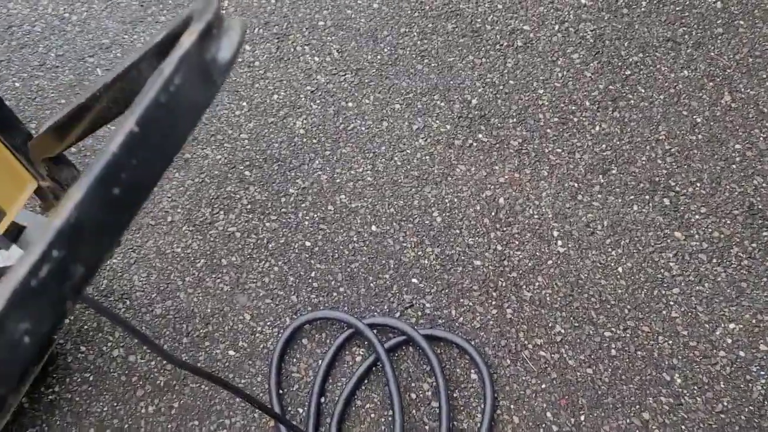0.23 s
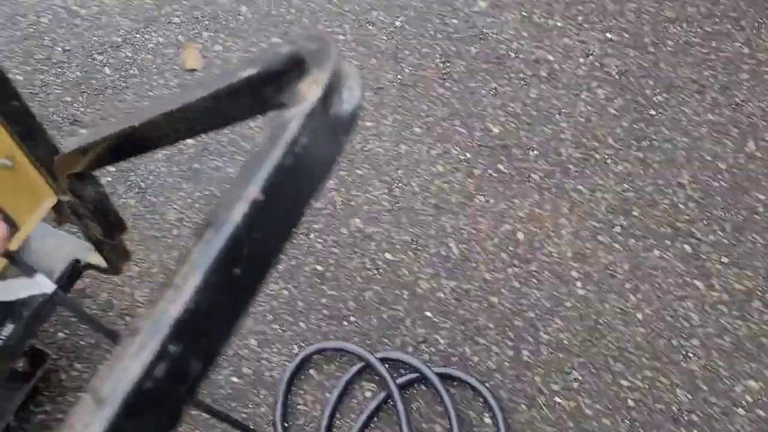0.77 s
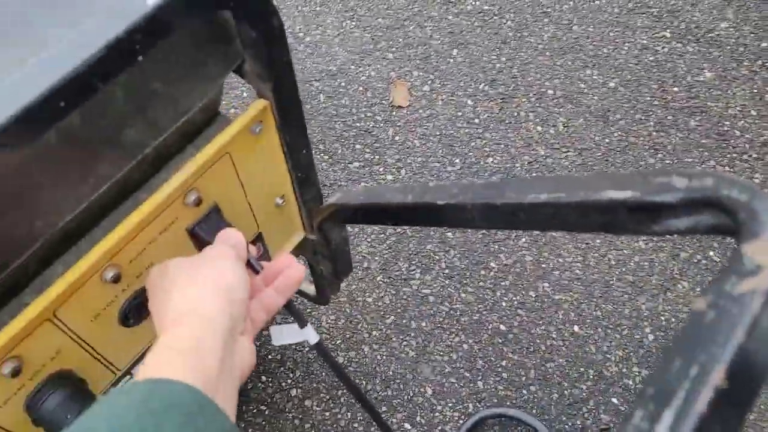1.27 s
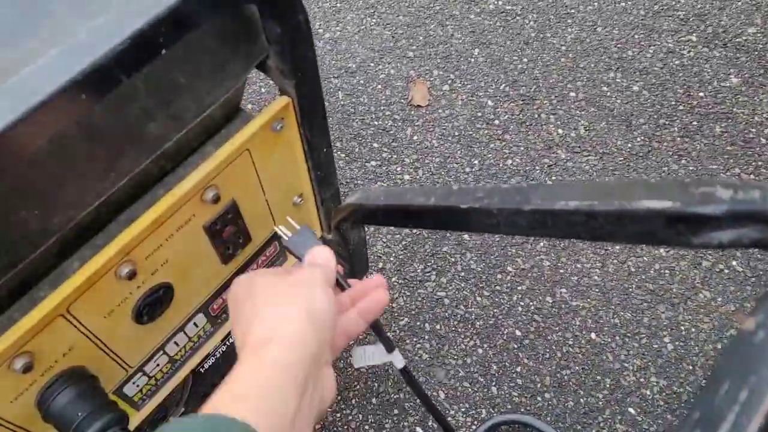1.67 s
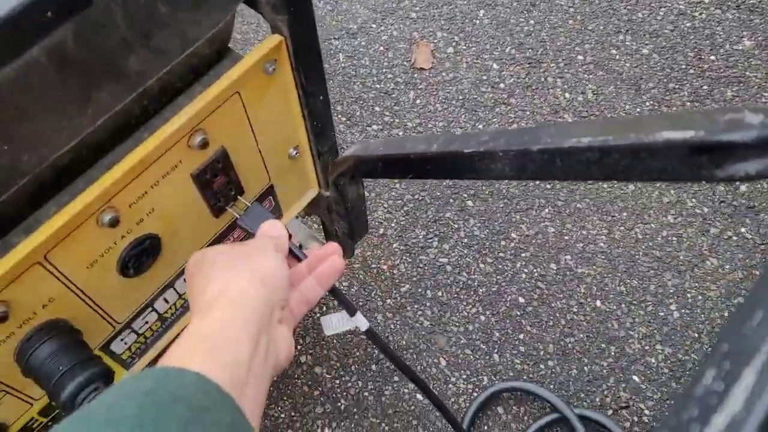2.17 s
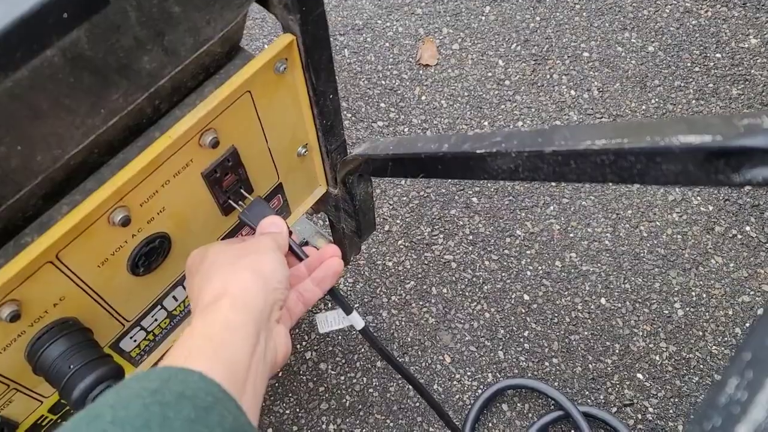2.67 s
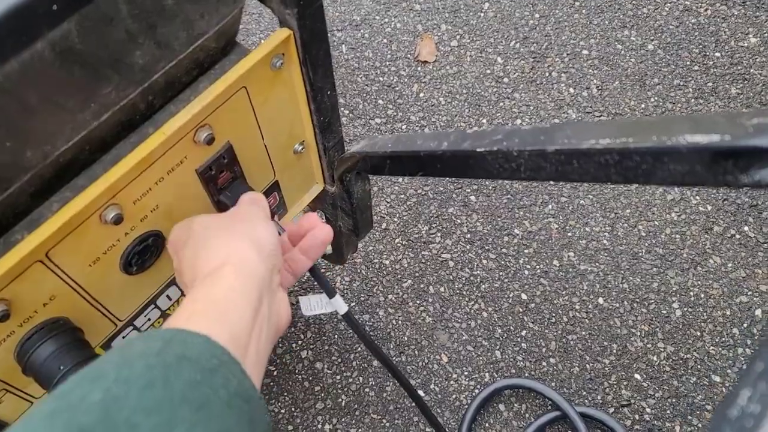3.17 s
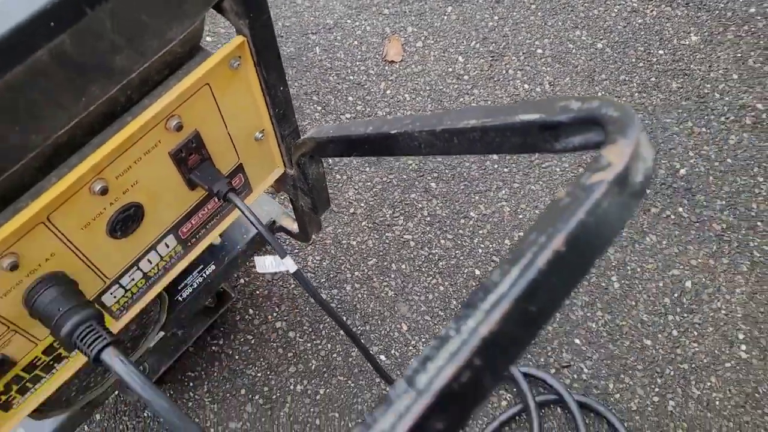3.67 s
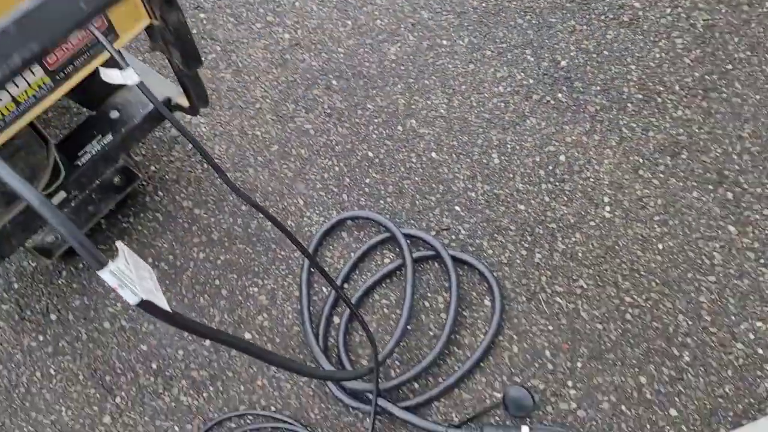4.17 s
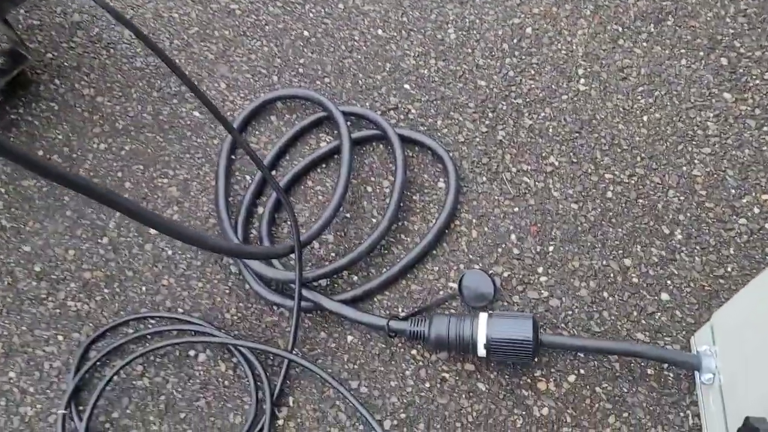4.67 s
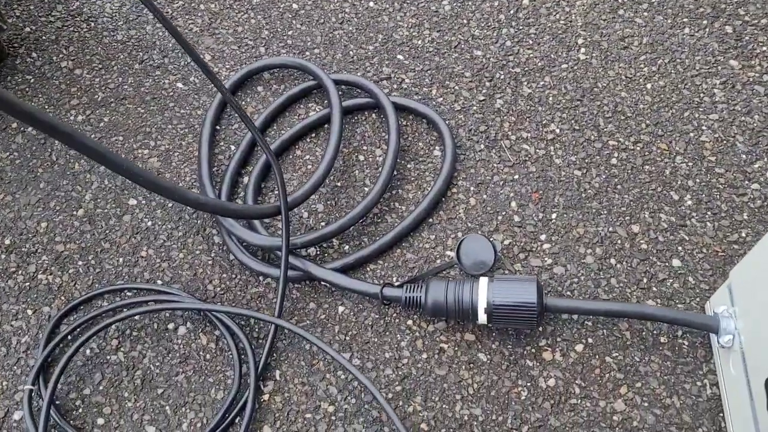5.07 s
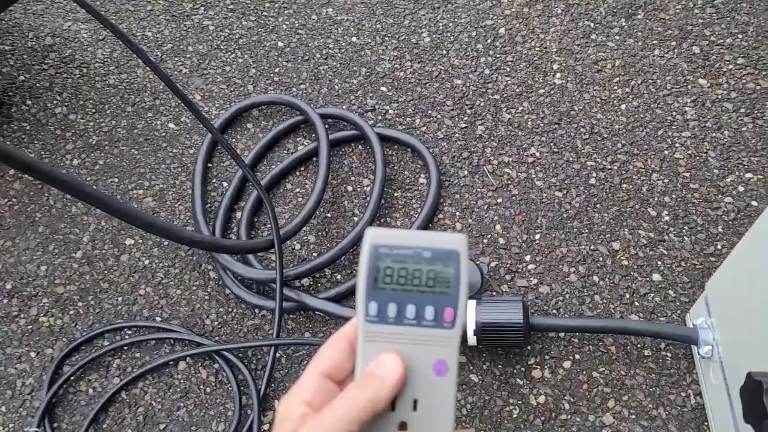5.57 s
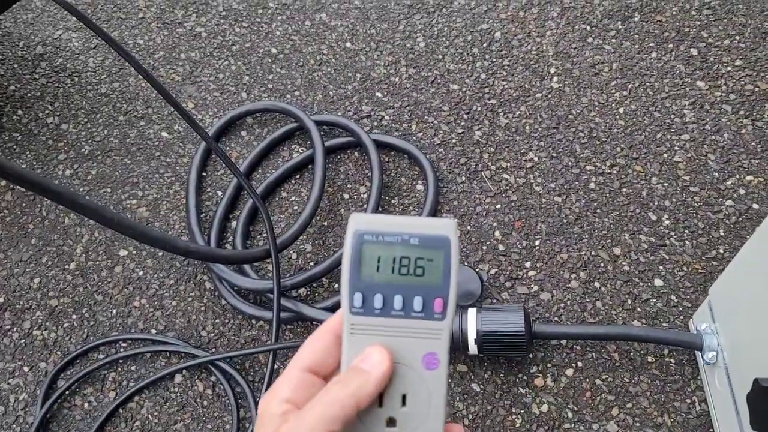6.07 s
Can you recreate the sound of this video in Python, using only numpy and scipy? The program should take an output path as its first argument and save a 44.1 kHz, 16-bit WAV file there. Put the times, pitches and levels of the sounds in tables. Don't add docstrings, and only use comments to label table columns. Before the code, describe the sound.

A portable single-cylinder four-stroke generator is already running and continues without a break for about 6.3 seconds outdoors on asphalt. Its exhaust fires roughly thirty times a second, a dense rough drone rather than separate puffs, with casing knocks and fine metallic valve ticks in every cycle. A weak fan whine sits within low rumble, midrange air rush and bright hiss, all pulsing with the engine. From 0 to 1 second the hand-held phone moves closer; from about 1.2 to 3.8 seconds it stays beside the panel, full and clattery. Between 4.2 and 5 seconds it swings away, the low throb and upper knocks easing while airy midrange becomes more apparent. Slight lags near 0.4, 1.6, 2.9, 4 and 5 seconds barely bend the pitch, with the deepest sag at the end. Close, wide stereo, no obvious reverberation, slightly patchy treble.

```python
import sys
import numpy as np
from scipy import signal
from scipy.fft import rfft, irfft, next_fast_len
from scipy.io import wavfile

SR = 44100
rng = np.random.default_rng(int(sys.argv[2]) if len(sys.argv) > 2 else 0)


def ratio_of_db(decibels):
    return 10 ** (np.asarray(decibels, float) / 20)


def dump_mix(stems):
    frames = np.atleast_2d(stems).T
    limited = np.clip(frames, -1, 1)
    pcm = np.round(limited * 32767).astype(np.int16)
    wavfile.write(sys.argv[1], SR, pcm)


N = 278271

# multiple of the cycle,
# panel left level/dB, panel right level/dB, away left level/dB, away right level/dB
EXHAUST_ORDERS = [(1, -35, -36, -41, -39), (2, -16, -15, -21.5, -22), (3, -26, -26, -31, -28),
                  (4, -29, -25.5, -36, -33.5), (5, -17, -15.5, -16.5, -16.0), (6, -29, -37, -28.5, -26),
                  (7, -37, -31, -35.5, -28), (8, -35, -27, -27, -26.5), (9, -32, -31, -36, -33.5),
                  (10, -36.5, -29, -29, -35.5), (11, -37, -35, -30, -27), (12, -33, -51, -38.5, -39)]
KNOCK_ORDERS = [(13, -31, -32.5, -49.5, -53), (14, -35.5, -46, -34.5, -53), (15, -40, -31, -36, -59),
                (16, -26.5, -36.5, -46.5, -29.5), (17, -41.5, -39, -40, -40.5), (18, -37, -29, -46, -49),
                (19, -43, -37, -45, -38), (20, -34, -29.5, -37, -43), (21, -39, -32.5, -52, -46),
                (22, -41, -46, -42, -48), (23, -49, -38.5, -42, -40.5), (24, -41.5, -32, -35.5, -31.5),
                (26, -53, -35, -34.5, -34), (29, -57, -39.5, -53, -50), (30, -41.5, -46, -40, -49),
                (31, -52, -44, -47, -43)]
# t/s of the deepest lag, lag/cycles, sag time/s
WEAK_FIRINGS = [
    (.365, .066, .365),
    (1.6, .049, .137),
    (2.135, .011, .111),
    (2.936, .04, .116),
    (3.955, .035, .234),
    (4.435, .034, .1),
    (4.952, .075, .114),
    (5.243, .044, .158),
    (5.82, .075, .14),
    (6.33, .115, .27),
]
# turn/cycles, f/Hz, t60/s, left level/dB, right level/dB, spread/dB
VALVE_TICKS = [
    (.78, 1590, 0.025, -24.5, -25, -3.5),
    (.79, 1810, 0.0051, -33, -20, 1.5),
    (0.57, 2400, .008, -34, -30, 2),
    (0.1, 3730, 0.0028, -29, -22, -2),
    (0.3, 6400, .006, -27, -27.5, 5),
    (0.6, 6000, .003, -24, -22.5, 3),
    (0.7, 5400, 0.0027, -26, -29, 3.5),
    (.44, 12800, .002, -28, -25, 2),
]
# f/Hz, panel level/dB per Hz, away level/dB per Hz
RUMBLE_SPECTRUM = [(25.1, -4, -6), (60, 0.5, 1), (149, -6, 4), (298, 0, 3), (496, 1, 4.5), (730, 0, 11),
                   (952, 2, 6.5), (1280, -30, -1)]
RUSH_SPECTRUM = [(930, -13.5, -11), (1130, -2.5, -6), (1290, 4, -2), (1280, 0, 2), (1530, -3.5, -1.5),
                 (1576, 0, -2.5), (1910, -10.5, -5.5), (2330, -14, -9.5), (2520, -18, -34)]
HISS_SPECTRUM = [(2090, -9, -28), (2290, 0, 0), (2420, 5.5, 4.5), (2680, -2, -1.5), (2710, 2, -2.5),
                 (3900, -2, 0.5), (4470, -3, 0), (5430, 3, 0.5), (6950, 1, -1), (7860, -3.5, -6),
                 (8990, 12, 12), (9820, -6, -7), (11900, -5.5, -3.5), (15300, -4, -4.5), (17000, -10, -10)]
# t/s, distance from the silencer/0-1, turned from the panel/0-1, cooling-air exposure/dB
PHONE_PATH = [(0, 0.8, 0.33, 0.5), (.4, 0.35, 0.37, 0), (.85, 0.27, 0.34, 0), (1.25, .05, .08, -0.5),
              (1.7, .03, 0, 0.5), (1.87, .02, 0.1, -1), (2.1, .02, 0.03, 0), (2.5, 0.1, .03, -0.7),
              (2.9, 0.05, 0.07, 0), (3.15, 0, 0, -1), (3.8, 0.2, 0.27, 0), (4.2, 0.26, 0.2, 0.5),
              (4.45, 0.64, 0.39, 1.5), (4.7, 0.96, 0.7, .5), (4.95, 0.97, 0.86, 1.6), (5.2, 1, 0.86, 0),
              (5.65, 0.94, 0.89, 0), (6.31, 1, 0.91, .5)]
# f/Hz, shared part/0-1, left lead at the panel/rad, left lead away/rad
MIC_PORTS = [(30, 0.7, 0.27, 0.68), (147, 0.87, 0.28, 0.18), (280, 1, 0.5, 0.78), (600, 0.67, 1.28, 2.37),
             (1020, 0.71, 1.65, 2.3), (1640, 0.96, 2.03, 3.27), (2010, 0.44, 2.42, 4.54),
             (3020, 0.33, 2.9, 5.1), (3840, 0.01, 2.8, 2.4)]
# f/Hz, panel left-right level/dB, away left-right level/dB
BODY_SHADE = [(101, 7, 1), (504, 3, 2.5), (770, -4, 3), (1210, 1.5, 4.5), (1790, -1, -5), (2830, 3.5, 3.5),
              (3960, -3, -4.5), (6500, 0.5, 1.5), (10000, -1, 1), (15000, -2.5, -1.5)]
# f/Hz, skirt width/Hz, floor width/Hz
PORT_NOTCHES = [(8450, 1300, 300), (8800, 900, 250), (9150, 1300, 350)]
# f/Hz, share of time left empty/0-1
TREBLE_GAPS = [(7700, 0), (8200, .35), (8550, .85), (9000, .88), (9350, .6), (9800, .22), (10800, .04),
               (15000, .02), (15700, .1)]
# panel level/dB, away level/dB, share of the exposure that it follows
EXHAUST_DB, KNOCK_DB, WHINE_DB = (-1.02, -0.24, 0.46), (0.3, 1.6, 0.4), (-29, -30.5, 2)
RUMBLE_DB, RUSH_DB, HISS_DB = (-30, -32, 0.7), (-27.5, -27, 1.2), (-27.5, -27, 1.7)
# panel level/dB, away level/dB
RUSH_PAN_DB, HISS_PAN_DB = (-2.5, -3.5), (-4, 0.5)
LOW_LAG_RAD, KNOCK_LAG_RAD = (.25, .5, 0), (.5, 1.6, 0)

CYCLE_HZ = 30.5396


def crank():
    start_turn, recovery, jitter = -.052, 1.18, .002
    s = np.arange(N) / SR
    lag = 0
    for deepest, depth, sag_s in WEAK_FIRINGS:
        width_s = np.where(s < deepest, sag_s, recovery * sag_s)
        lag = lag + depth * np.exp(-((s - deepest) / width_s) ** 2)
    return start_turn + CYCLE_HZ * s - lag + jitter * drift(5.0)


def exhaust(turns, away):
    pulse_turn, second_dip_turn, second_dip = .495, .41, .8
    panel_echo_rad = 2.1

    def line_up(order):
        second = second_dip * np.exp(-2j * np.pi * order * second_dip_turn)
        phase = np.pi * (order > 1) + np.angle(1 + second)
        phase = phase - (order < 4) * (order - 1) * level(LOW_LAG_RAD, away)
        return phase + (order > 8) * panel_echo_rad * (1 - away) + (order in (6, 8)) * .5

    return orders(EXHAUST_ORDERS, turns - pulse_turn, away, line_up, wander_db=1.3, wander_rad=.2)


def knock(turns, away):
    knock_turn, echo_turn, echo = .385, .38, .9

    def line_up(order):
        second = echo * away * np.exp(-2j * np.pi * order * echo_turn)
        return np.angle(1 + second) - level(KNOCK_LAG_RAD, away)

    burst = orders(KNOCK_ORDERS, turns - knock_turn, away, line_up, wander_db=1.0, wander_rad=.1)
    return ratio_of_db(0.99 * drift(8.5)) * burst


def orders(table, turns, away, line_up, wander_db, wander_rad):
    out = np.zeros((2, N))
    for order, *db in table:
        order = round(order)
        level_db = np.outer(db[:2], 1 - away) + np.outer(db[2:], away)
        loose = 0.25 if order in (2, 5) else 1
        phase = line_up(order) + loose * wander_rad * drift(2.8)
        out += ratio_of_db(level_db + loose * wander_db * drift(2.2)) * tone(turns, order, phase, away)
    return out


def tone(turns, order, phase, away):
    hz = order * CYCLE_HZ
    lead = (1 - away) * at_hz(MIC_PORTS, hz, axis=2) + away * at_hz(MIC_PORTS, hz, axis=3)
    return np.sqrt(2) * np.cos(2 * np.pi * order * turns + phase + lead * [[1], [0]])


def valve_gear(turns, jitter_s):
    out = np.zeros((2, N))
    for turn, hz, t60, left_db, right_db, spread_db in VALVE_TICKS:
        at = np.flatnonzero(np.diff(np.floor(turns - turn)))
        timing, strength = rng.standard_normal((2, len(at)))
        at = np.clip(at + (timing * jitter_s * SR).astype(int), 0, N - 1)
        clicks = np.full(N, 1e-18)
        clicks[at] = ratio_of_db(spread_db * strength)
        r, w = ratio_of_db(-60 / (t60 * SR)), 2 * np.pi * hz / SR
        mode = [1, -2 * r * np.cos(w), r * r]
        rung = signal.lfilter([0, np.sin(w)], mode, clicks)
        rung = signal.lfilter([1 - r, 0, r - 1], mode, rung) * np.e
        late = round(at_hz(MIC_PORTS, hz, axis=2) / w)
        right = np.concatenate([np.zeros(late), rung[:N - late]])
        out += ratio_of_db([[left_db], [right_db]]) * [rung, right]
    return out


def fan_whine(turns, whine_db, away):
    fan_order = 40
    level_db = whine_db + 0.25 * drift(9.0) + throb(turns, 0.052, 0.83, 2.0) + [[-1.5], [0]]
    return ratio_of_db(level_db) * tone(turns, fan_order, 0.75 * drift(3.2), away)


def air(turns, away, exposure_db):
    rumble_db = level(RUMBLE_DB, away, exposure_db) + 5.5 + 0.98 * drift(36.0)
    rush_db = level(RUSH_DB, away, exposure_db) + 5.5 + 0.36 * drift(8.3)
    hiss_db = level(HISS_DB, away, exposure_db) + 6.0 + 0.73 * drift(7.2)
    rumble = ratio_of_db(rumble_db + throb(turns, 0.31, 0.85, 0.21)) * port_noise(RUMBLE_SPECTRUM, away)
    rush = ratio_of_db(rush_db + throb(turns, 0.32, 0.53, 0.27)) * port_noise(RUSH_SPECTRUM, away)
    hiss = ratio_of_db(hiss_db + throb(turns, 0.56, 0.99, 0.52)) * port_noise(HISS_SPECTRUM, away)
    return rumble + panned(level(RUSH_PAN_DB, away)) * rush + panned(level(HISS_PAN_DB, away)) * hiss


def throb(turns, peak_turn, once_db, twice_db):
    angle = 2 * np.pi * (turns - peak_turn)
    return once_db * np.cos(angle) + twice_db * np.cos(2 * angle)


def port_noise(spectrum, away):
    size = next_fast_len(N)
    hz = np.maximum(np.arange(size // 2 + 1) * SR / size, 1)
    band = (hz > spectrum[0][0]) * (hz < spectrum[-1][0])
    shared, left, right = rfft(rng.standard_normal((3, size))) * band
    share = np.clip(at_hz(MIC_PORTS, hz, axis=1), 0, 1)
    heard = []
    for place in (1, 2):
        lead = np.exp(1j * at_hz(MIC_PORTS, hz, axis=place + 1))
        common = np.sqrt(share) * shared * [lead, np.ones_like(lead)]
        pair = common + np.sqrt(1 - share) * np.array([left, right])
        colour = ratio_of_db(at_hz(spectrum, hz, axis=place)) * panned(at_hz(BODY_SHADE, hz, axis=place))
        heard.append(rms_one(irfft(pair * colour, size)[:, :N]))
    return (1 - away) * heard[0] + away * heard[1]


def panned(db):
    return ratio_of_db(np.array([db / 2, -db / 2]))


def level(db, away, exposure_db=0):
    return db[0] + (db[1] - db[0]) * away + db[-1] * exposure_db


def drift(rate):
    r = np.exp(-80 * np.pi * rate / SR)
    noise = rng.standard_normal(N // 40 + 2002)
    slow = signal.lfilter([1], [1, -2 * r, r * r], noise)[2000:]
    return np.interp(np.arange(N) / 40, np.arange(len(slow)), rms_one(slow))


def rms_one(x):
    return x / np.sqrt(np.mean(x ** 2) + 1e-20)


def in_time(rows):
    s, *columns = np.transpose(rows)
    return [np.interp(np.arange(N) / SR, s, c) for c in columns]


def at_hz(points, hz, axis):
    return np.interp(np.log(hz), np.log(np.array(points)[:, 0]), np.array(points)[:, axis])


def scene():
    turns = crank()
    far, away, exposure_db = in_time(PHONE_PATH)
    far, away = np.clip([far, away], 0, 1)
    pulses = ratio_of_db(level(EXHAUST_DB, far, exposure_db)) * exhaust(turns, far)
    knocks = ratio_of_db(level(KNOCK_DB, away, exposure_db)) * knock(turns, away ** 1.45)
    ticks = valve_gear(turns, jitter_s=0.00017)
    whine_db = level(WHINE_DB, far ** 4.8, exposure_db) + 2.7 * drift(1.1)
    whine = fan_whine(turns, whine_db, away)
    return pulses + knocks + ticks + whine + air(turns, away, exposure_db)


def port_cavity(x):
    for hz, skirt_hz, floor_hz in PORT_NOTCHES:
        c = 2 * np.cos(2 * np.pi * hz / SR)
        zero, pole = np.exp(-np.pi * np.array([floor_hz, skirt_hz]) / SR)
        bass_gain = (1 - zero * c + zero ** 2) / (1 - pole * c + pole ** 2)
        x = signal.lfilter([1, -zero * c, zero ** 2], [1, -pole * c, pole ** 2], x) / bass_gain
    return x


def treble_dropouts(x):
    top_hz = 15760
    hz, s, frames = signal.stft(x, SR, nperseg=2048)
    own = rng.standard_normal((2, len(hz) // 4 + 1, len(s)))
    own = np.repeat(own, 4, axis=1)[:, :len(hz)]
    together = drift(7.0)[np.minimum((s * SR).astype(int), N - 1)]
    rank = 1 / (1 + np.exp(-1.7 * (0.55 * together + 0.83 * own)))
    kept = rank > np.interp(hz, *np.transpose(TREBLE_GAPS))[:, None]
    return signal.istft(frames * kept * (hz < top_hz)[:, None], SR, nperseg=2048)[1][:, :N]


def low_pass(x):
    return signal.sosfilt(signal.butter(12, 16390, fs=SR, output="sos"), x)


def record(dry):
    ceiling = 1.25
    rounded = ceiling * np.tanh(dry / ceiling)
    mix = treble_dropouts(port_cavity(rounded))
    return low_pass(mix)


dry = scene()
out = record(dry)
dump_mix(out)
```